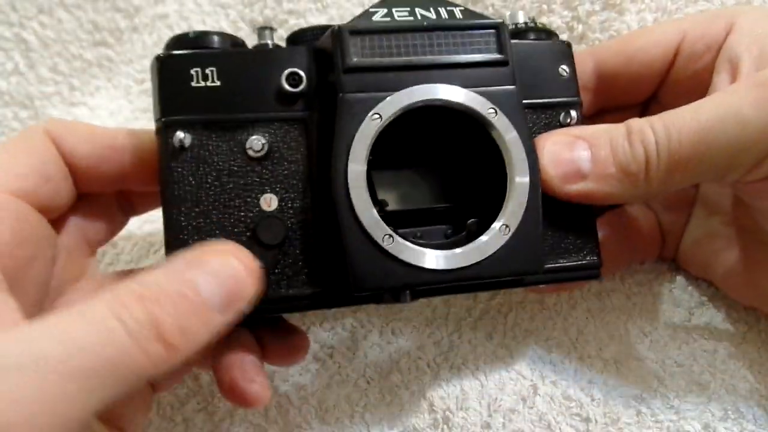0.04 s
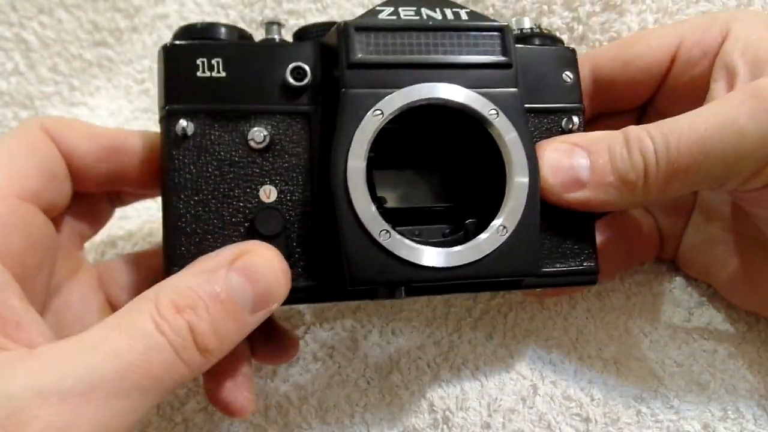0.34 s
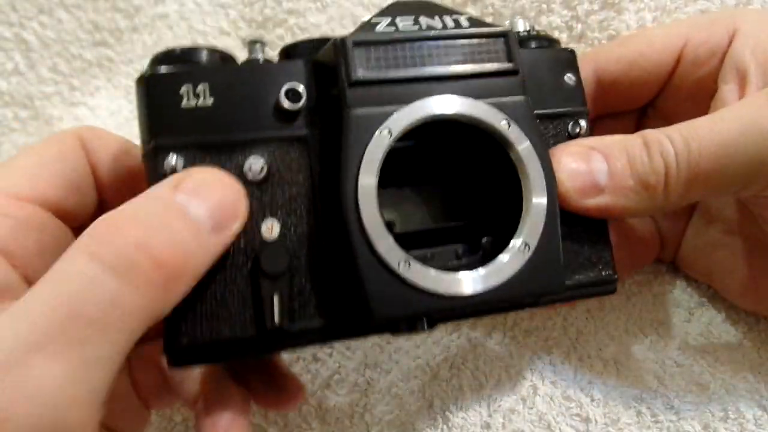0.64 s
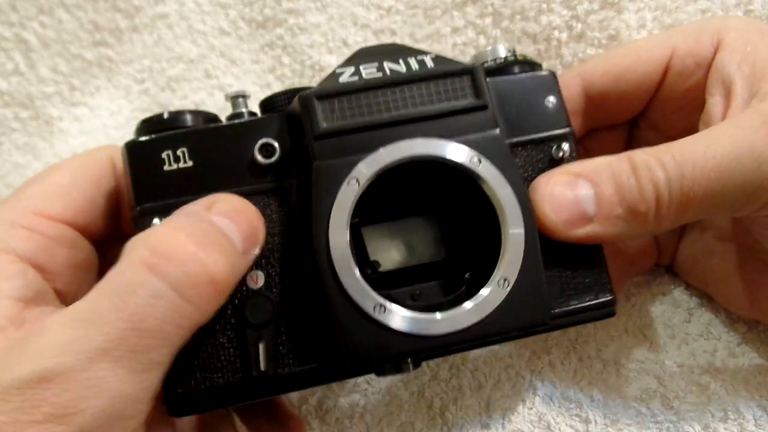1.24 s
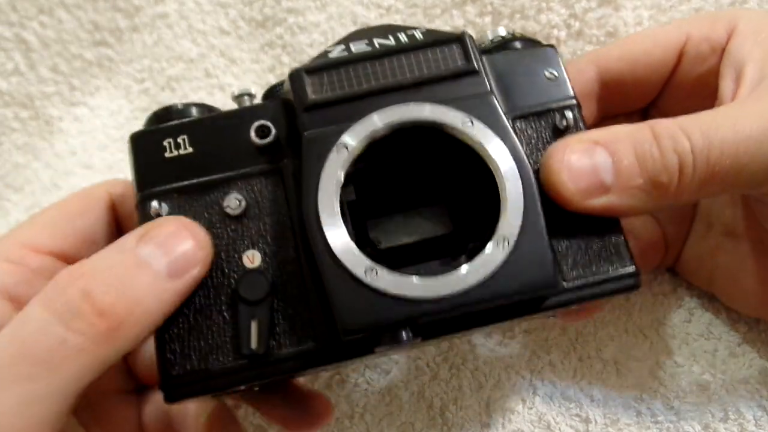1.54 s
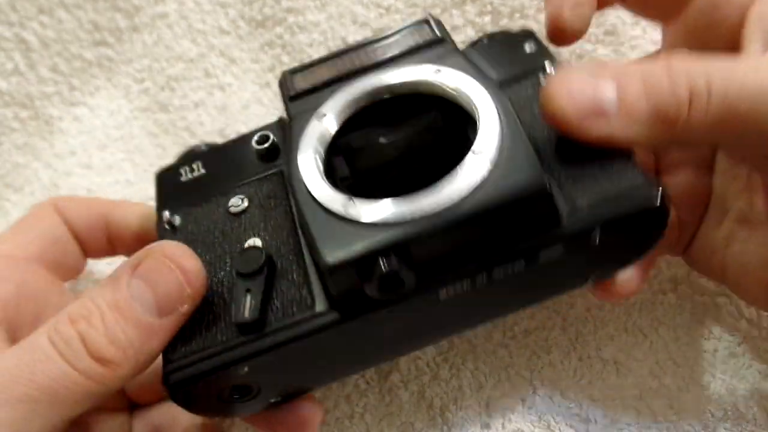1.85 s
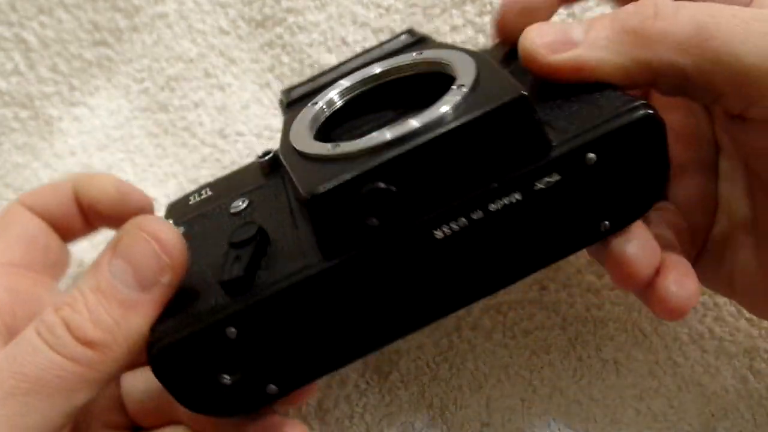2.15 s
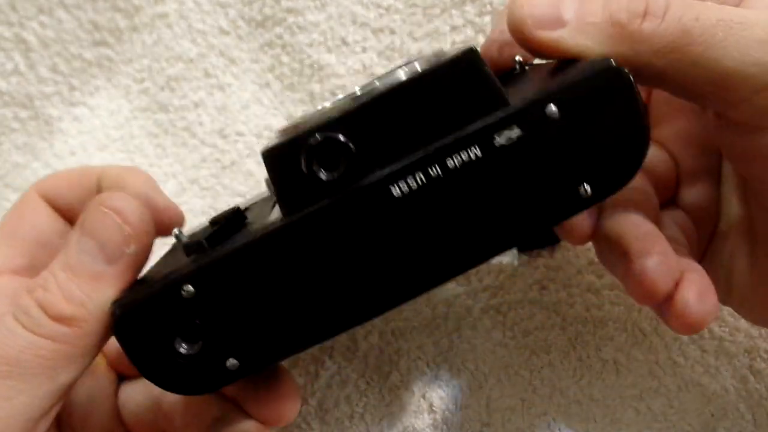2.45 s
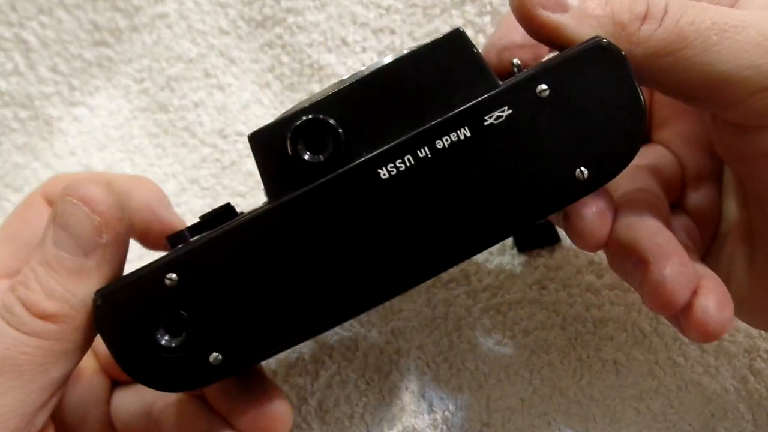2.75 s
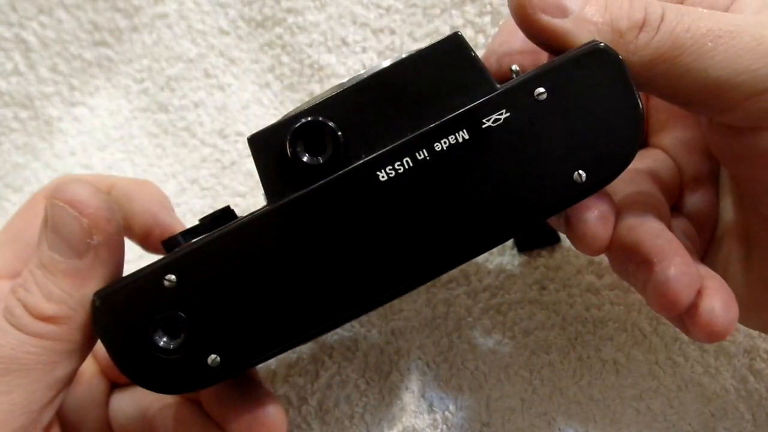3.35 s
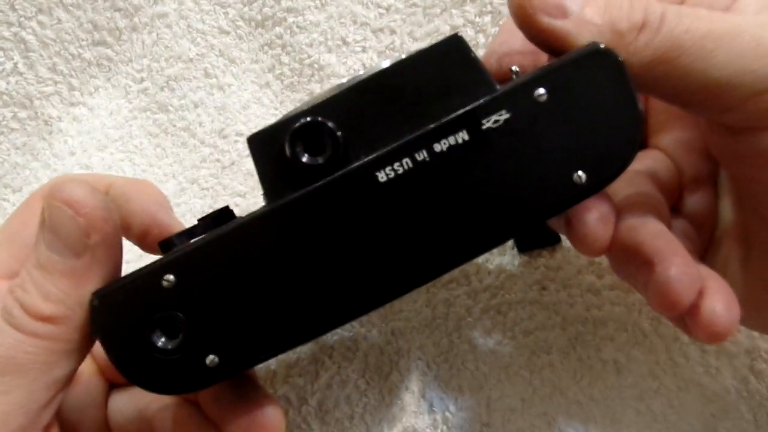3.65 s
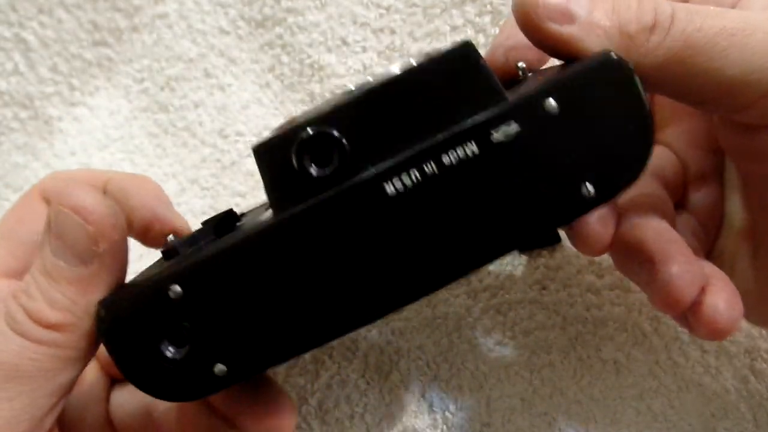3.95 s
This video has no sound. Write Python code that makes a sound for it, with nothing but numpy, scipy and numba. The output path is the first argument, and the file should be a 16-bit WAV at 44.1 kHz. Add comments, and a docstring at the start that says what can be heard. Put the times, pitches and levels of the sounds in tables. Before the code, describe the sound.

Close up in a quiet room, a wind-up camera timer gives a short whirr, two sharp clicks and a few faint taps. It then restarts with a snap, buzzing thinly and continuously, changing colour as the camera is turned over.

```python
"""A brief clockwork whirr slows to a halt: the self-timer of a metal camera, close by in a quiet room.
The lever clicks twice, then the spring is released and the escapement buzzes at about 225 beats a
second. Each beat is an impact that draws a bright tick from the steel parts and excites the modes
of the case. The hands turn the body over, which changes how it rings."""
import sys
import numpy as np
from scipy import signal
from scipy.fft import rfft, irfft
from scipy.io import wavfile
from scipy.ndimage import uniform_filter1d
from numba import njit

SR = 44100
rng = np.random.default_rng(int(sys.argv[2]) if len(sys.argv) > 2 else 0)


def output_pcm(signal):
    """Save a mono or channel-first signal as 16-bit PCM at the path in sys.argv[1].

    Samples are clipped to [-1, 1] before scaling.
    """
    pcm = np.clip(np.atleast_2d(signal).T, -1, 1) * 32767
    wavfile.write(sys.argv[1], SR, np.round(pcm).astype(np.int16))


N = 176400
TIME = np.arange(N) / SR


def undb(db):
    """Amplitude ratio of a level in decibels."""
    return 10 ** (np.asarray(db) / 20)


def curve(rows, column=1):
    """Linear interpolation of one column of a table over time."""
    rows = np.array(rows)
    return np.interp(TIME, rows[:, 0], rows[:, column])


def cut(x, order, hz, kind):
    """Maximally flat high-pass or low-pass filtering."""
    return signal.sosfilt(signal.butter(order, hz, kind, fs=SR, output="sos"), x)


def ring(x, response):
    """Convolution with an impulse response scaled to unit energy."""
    return signal.fftconvolve(x, response / np.linalg.norm(response))[:N]


def colour(points, size=2048):
    """Minimum-phase impulse response of a spectrum given as (Hz, dB) points."""
    hz, db = np.array(sorted(points)).T
    bin_hz = np.arange(size // 2 + 1) * SR / size
    gain = undb(np.interp(np.log(bin_hz + 1), np.log(hz), db))
    cepstrum = irfft(np.log(gain))
    cepstrum[1:size // 2] *= 2  # folding onto positive time makes the response causal
    cepstrum[size // 2 + 1:] = 0
    return irfft(np.exp(rfft(cepstrum)))


def modes(rows, size=4096):
    """Modal superposition: a sum of damped cosines, the wider resonances dying sooner."""
    t = TIME[:size]
    return sum(undb(db) * width * np.exp(-np.pi * width * t) * np.cos(2 * np.pi * hz * t)
               for hz, width, db in rows)


def resonate(x, hz, width_hz):
    """Forced response of a single damped resonance."""
    return ring(x, modes([(hz, width_hz, 0)]))


@njit
def band(x, hz, width_hz):
    """State-variable band-pass with unit gain at its moving centre."""
    y, band_state, low_state = np.empty(len(x)), 0., 0.
    for i in range(len(x)):
        step, damping = np.tan(np.pi * hz[i] / SR), width_hz / hz[i]
        passed = (band_state + step * (x[i] + 1e-18 - low_state)) / (1 + step * (step + damping))
        band_state = 2 * passed - band_state
        low_state += 2 * step * passed
        y[i] = damping * passed
    return y


def burst(start, db, decay_s):
    """Contact noise with a sudden onset and exponential decay."""
    age = TIME - start
    return undb(db) * (age >= 0) * np.exp(-np.maximum(age, 0) / decay_s) * rng.standard_normal(N)


# Spectrum of the room noise. Each row: frequency in Hz, relative density in dB.
ROOM_SPECTRUM = [(15, -61), (25, -10.5), (248, -5), (604, -9), (791, -5.5), (881, -11.5), (1550, -12.5),
                 (1730, -12.5), (5670, -19.5), (15800, -19)]
# Its loudness. Each row: time in seconds, level in dB.
ROOM_LEVEL = [(0, -53), (.44, -59), (.68, -57.5), (.8, -65), (.92, -70), (1.09, -74.5), (1.16, -64.5),
              (1.9, -65), (2.7, -60), (4, -64.5)]

def room_noise():
    """Spectrally shaped noise forms a soft floor that sinks during the pause."""
    return undb(curve(ROOM_LEVEL)) * ring(rng.standard_normal(N), colour(ROOM_SPECTRUM))


# Pace of the long run, shared by hum and ticks. Each row: time in seconds, beats per second.
LONG_BEAT_RATE = [(1.12, 233.6), (1.18, 216.5), (1.26, 218), (1.35, 234.3), (1.46, 223.2), (1.53, 236.6),
                  (1.9, 213.7), (1.94, 228), (2.16, 232.2), (2.54, 213.7), (2.76, 229.9), (3.34, 215.9),
                  (3.37, 227.1), (3.57, 220.4), (3.94, 205.2), (4.0, 213.2)]
# Loudness of the hum. Each row: time in seconds, rms level in dB.
BODY_HUM_LEVEL = [(1.1, -110), (1.3, -76), (1.6, -71), (2, -81), (2.7, -79.5), (4, -90)]

def body_hum():
    """Forced vibration: the whole body shakes faintly at the beat rate."""
    phase = 2 * np.pi * np.cumsum(curve(LONG_BEAT_RATE)) / SR
    return undb(curve(BODY_HUM_LEVEL)) * np.sqrt(2) * np.sin(phase)


# Palms rubbing on the body. Each row: time in seconds, level in dB.
PALM_LEVEL = [(1.1, -96), (1.2, -75.5), (2.0, -81.5), (2.7, -66), (4, -67.5)]

def palm_rub():
    """Sliding friction makes a soft, low band of noise."""
    return undb(curve(PALM_LEVEL)) * resonate(rng.standard_normal(N), hz=140, width_hz=120)


# Fingers on the body. Each row: start in seconds, level in dB, centre and width in Hz, decay in seconds.
FINGER_KNOCKS = [(1.109, -50, 500, 700, .012), (1.295, -54.5, 110, 110, 0.019),
                 (1.713, -54, 620, 800, 0.03)]

def finger_knocks():
    """Soft impacts excite low, heavily damped resonances."""
    return sum(resonate(burst(start, db, decay_s), hz, width_hz)
               for start, db, hz, width_hz, decay_s in FINGER_KNOCKS)


# Taps between the runs. Each row: start in seconds, level in dB.
FAINT_TAPS = [(0.367, -46.5), (0.603, -51), (.701, -57), (0.804, -54), (1.002, -66)]

def faint_taps():
    """Brief contacts excite one broad treble resonance."""
    contacts = sum(burst(start, db, decay_s=.0022) for start, db in FAINT_TAPS)
    return resonate(contacts, hz=5170, width_hz=2000)


# Two lever clicks and the release snap. Each row: start in seconds, level in dB, decay in seconds.
LEVER_IMPACTS = [(.2378, -29, .001), (.2392, -18, .0018), (.4665, -29, .001), (.4703, -23, .001),
                 (.4718, -16.5, .0012), (.4732, -17, .0018), (1.1163, -14, .0006), (1.141, -15, .0008)]
# Spectrum of a click. Each row: frequency in Hz, relative density in dB.
LEVER_SPECTRUM = [(150, -24), (1000, -21), (1520, -15.5), (2200, -22), (4090, -14.5), (5040, -0.5),
                  (5400, -13), (6800, -14), (9000, -7), (10400, -2.5), (13000, -7), (14700, 1.5),
                  (15700, -18)]

def lever_clicks():
    """Hard impacts are short and therefore broadband; each click is a cluster of them."""
    return ring(sum(burst(*impact) for impact in LEVER_IMPACTS), colour(LEVER_SPECTRUM))


def beat_times(rate, start_s, end_s):
    """Phase is the integral of rate: the escapement lets a tooth pass at each whole cycle."""
    t = TIME[int(start_s * SR):int(end_s * SR)]
    cycles = np.cumsum(np.interp(t, *np.array(rate).T)) / SR
    return np.interp(np.arange(int(cycles[-1]) + 1), cycles, t)


def impacts(times, blow_db, bounce_db, chatter_db, bounce_delay_s=.0008, chatter_decay_s=.0052):
    """Impact with rebound: each beat is a blow, four bounces and a fading chatter of loose parts."""
    blows, bounces = np.zeros(N), np.zeros(N)
    sample = lambda seconds: np.clip(seconds * SR, 0, N - 1).astype(int)
    strength = undb(blow_db)
    np.add.at(blows, sample(times), strength)
    delays = rng.exponential(bounce_delay_s, (len(times), 4))
    rebounds = undb(bounce_db) * strength[:, None] * rng.standard_normal(delays.shape)
    np.add.at(bounces, sample(times[:, None] + delays), rebounds)
    settling = signal.lfilter([1], [1, -np.exp(-1 / (SR * chatter_decay_s))], blows)
    return blows + bounces + undb(chatter_db) * settling * rng.standard_normal(N)


def escapement(times, unevenness=1, jitter_s=.00007, gear_db=-26, split_hz=12300):
    """Nearly periodic impacts drive the steel parts and the case; returns the force on each."""
    running = (TIME >= times[0]) & (TIME <= times[-1])
    shift, scatter = np.clip(rng.standard_normal((len(times), 2)), -1.5, 2.5).T
    times, scatter = times + jitter_s * shift, unevenness * scatter
    pallet = impacts(times, 2.5 * scatter, bounce_db=-10, chatter_db=-29)
    wheel = impacts(times, 1.64 * scatter, bounce_db=-6, chatter_db=-14.5)
    case = impacts(times, .3 * scatter, bounce_db=-11, chatter_db=-26)
    gear_rasp = undb(gear_db) * running * rng.standard_normal(N)
    unit = lambda force: force / force[running].std()
    # The pallet sounds above the split, the escape wheel below.
    steel = cut(unit(pallet), 5, split_hz, "high") + cut(unit(wheel), 5, split_hz, "low")
    return steel, unit(case + gear_rasp)


# Broad response of the case between its modes. Each row: frequency in Hz, relative density in dB.
SHELL_SPECTRUM = [(30, -56.5), (100, -32.5), (200, -15), (400, -13), (750, -10), (1050, -17), (1220, 3),
                  (2300, -2), (2700, -7), (4300, -2.5), (5300, -15), (5800, -7.5), (9000, -15.5)]

def case_ring(force, resonances, shell_db, cutoff_hz=1235):
    """Radiation from a shell: modes sound above a cutoff, and a broad response fills in between."""
    modal = cut(ring(force, modes(resonances)), 6, cutoff_hz, "high")
    broad = undb(shell_db) * ring(force, colour(SHELL_SPECTRUM))
    return (modal + broad) / np.hypot(1, undb(shell_db))


# Pace of the short run. Each row: time in seconds, beats per second.
SHORT_BEAT_RATE = [(0, 137), (.022, 149), (.04, 151), (.08, 121), (.11, 178), (.13, 135)]
# Its final teeth pass one by one. Each entry: time in seconds.
FINAL_TEETH_S = [.1338, .1434, .152, .1606, .1713, .1825, .1932]
# Spectrum of its steel ticks. Each row: frequency in Hz, relative density in dB.
SHORT_TICKS = [(2940, -57.5), (5000, -8.5), (5450, -22), (6150, -16.5), (8450, -16), (10300, -5),
               (11700, -13), (12100, -8), (14300, -2), (15400, -2.5), (15800, -5)]
# Modes of the case. Each row: frequency in Hz, bandwidth in Hz, relative peak in dB.
SHORT_MODES = [(1587, 48, -3.5), (2223, 62, -4), (2380, 23, -9), (2556, 170, -8.5), (2930, 85, -10),
               (3090, 32, -17), (3270, 43, -7), (3630, 120, -7.5), (3960, 76, -8), (4223, 37, 2),
               (4970, 200, -5.5), (5700, 110, -8), (6000, 180, -4.5), (6700, 270, -10)]

def short_run():
    """An impulse train slows, so that its buzz breaks up into separate ticks and stops."""
    times = np.append(beat_times(SHORT_BEAT_RATE, start_s=.0016, end_s=.128), FINAL_TEETH_S)
    steel, case = escapement(times, unevenness=.3)
    ticks = undb(-23) * ring(steel, colour(SHORT_TICKS))
    return ticks + undb(-40) * case_ring(case, SHORT_MODES, shell_db=-8.5)


# Loudness of the long run. Each row: time in seconds, steel ticks in dB, case ring in dB.
RUN_LEVELS = [(1.12, -14.5, -36), (1.14, -17, -42), (1.16, -15, -35.5), (1.51, -17, -38),
              (1.59, -14, -37.5), (1.63, -26, -40), (1.65, -21.5, -41), (1.79, -24, -49), (2.06, -26, -46),
              (2.19, -23.5, -44), (2.36, -26.5, -42), (2.41, -23.5, -39), (2.5, -25.5, -43.5),
              (2.79, -22, -38.5), (2.84, -22.5, -39), (3.98, -23, -38.5)]
# The body leaves face-on, is tilted, tilts on, rests mostly base up. Each entry: time in seconds.
TURN_TIMES_S = [1.58, 1.72, 2.149, 2.6]
# Tick spectra in the three poses. Each row: frequency in Hz, relative density in dB.
FRONT_TICKS = [(2940, -38.5), (5000, -27), (5780, -43), (6180, -21), (7240, -25.5), (8700, -15.5),
               (9210, -18.5), (13000, -7.5), (14400, 2), (15800, -1.5)]
TILTED_TICKS = [(2940, -35), (5000, -19), (5590, -26.5), (6670, -15.5), (7240, -19), (7820, -15.5),
                (8490, -14.5), (12200, -10), (14400, -0.5), (15100, 4.5), (15800, -5)]
BASE_TICKS = [(2940, -50.5), (5000, -25), (5780, -30), (6180, -19.5), (7900, -10), (8410, -15.5),
              (9810, -4), (10700, -12.5), (11300, -3), (11700, -9), (12900, 1), (13500, -3.5), (14650, 5),
              (15300, 3.5), (15700, -4.5)]
# Case modes in the three poses. Each row: frequency in Hz, bandwidth in Hz, relative peak in dB.
FRONT_MODES = [(1560, 34, 1.5), (2087, 46, -1), (2350, 47, -8), (2706, 51, -7.5), (2996, 51, -12),
               (3343, 38, -8), (3670, 140, -12), (4210, 35, -4.5), (4920, 270, -3), (5530, 80, -5),
               (5500, 30, -21), (6150, 79, -2), (6400, 44, -6), (6760, 74, -7.5)]
TILTED_MODES = [(1587.6, 89, 2.5), (1890, 112, 2), (2395, 73, -24), (2880, 38, -3), (3260, 24, -3.5),
                (3425, 160, -8.5), (3875, 46, 0.5), (4310, 63, -15), (4890, 110, -7), (5440, 45, -19),
                (6960, 170, -6)]
BASE_MODES = [(1570, 45, 2.5), (1930, 150, -2), (2078.4, 37.9, -8), (2310, 53, -12.5), (2630, 390, -13),
              (3280, 160, -9), (3924, 28, -6), (4155, 52, -2.5), (4320, 33, -12), (4810, 33, -0.5),
              (5280, 55, -4.5), (5650, 29, -1), (6010, 48, -3), (6340, 70, -5.5)]
# Broad response of the shell. Each entry: level in dB against the modes, for one pose.
SHELL_BALANCE_DB = [-6, -8.5, -7.5]
# A cancellation that slides down with the tilt. Each row: time in seconds, centre in Hz, depth 0 to 1.
TILT_NOTCH = [(1.6, 12020, 0), (1.75, 10350, 0.8), (1.88, 9670, 0.9), (2.0, 8960, 0), (2.2, 8500, 0)]

def long_run():
    """Directional radiation: the buzz changes colour as the body turns through three poses."""
    steel, case = escapement(beat_times(LONG_BEAT_RATE, start_s=1.11, end_s=4.0))
    pose = np.interp(TIME, TURN_TIMES_S, [.0069, .95, 1.07, 1.7])  # 0 face-on, 1 tilted, 2 base up
    tick_gain, case_gain = undb(curve(RUN_LEVELS)), undb(curve(RUN_LEVELS, column=2))
    poses = [(FRONT_TICKS, FRONT_MODES), (TILTED_TICKS, TILTED_MODES), (BASE_TICKS, BASE_MODES)]
    buzz = 0
    for k, (spectrum, resonances) in enumerate(poses):
        share = np.maximum(1 - abs(pose - k), 0)
        ticks = tick_gain * ring(steel, colour(spectrum))
        ringing = case_gain * case_ring(case, resonances, SHELL_BALANCE_DB[k])
        buzz += share * (ticks + ringing)
    return buzz - curve(TILT_NOTCH, column=2) * band(buzz, curve(TILT_NOTCH), width_hz=2200.)


def moving_echoes(x, decay_s, patterns, size=16384):
    """Diffuse reflection: random echo patterns crossfade at constant power as the camera moves."""
    place = np.linspace(0, patterns - 1, N)
    decay = np.exp(-TIME[:size] / decay_s)
    shares = (np.maximum(1 - abs(place - k), 0) for k in range(patterns))
    return sum(np.sqrt(share) * ring(x, rng.standard_normal(size) * decay) for share in shares)


def reflections(x, room_t60_s=.16, room_db=-8.5, near_db=-4, near_top_hz=10000):
    """Brief room reverberation; interference with near echoes off a close surface combs all but the top treble."""
    x = x + undb(room_db) * moving_echoes(x, room_t60_s / np.log(1000), patterns=9)
    low = signal.sosfiltfilt(signal.butter(4, near_top_hz, fs=SR, output="sos"), x)
    near = undb(near_db) * moving_echoes(low, decay_s=.006, patterns=16)
    return x - low + (low + near) / np.hypot(1, undb(near_db))


def drift(steps_per_s):
    """A moving average smooths random steps into a slow wander with a spread near 1."""
    hold = int(SR / steps_per_s)
    return uniform_filter1d(np.repeat(rng.standard_normal(N // hold + 1), hold), hold)[:N]


# Narrow dips in each run, the long run's widest near 5.8 kHz. Each row: centre in Hz, width in Hz.
SHORT_DIPS = [(1750, 115), (4530, 300)]
LONG_DIPS = [(1720, 24), (4030, 45), (5760, 294), (6530, 58)]

def spectral_dips(x, dips, wander_share=.009):
    """Band rejection: narrow, slightly wandering dips hollow out the sound."""
    for hz, width_hz in dips:
        centre_hz = hz * (1 + wander_share * drift(steps_per_s=5))
        x = x - band(x, centre_hz, float(width_hz))
    return x


def scene():
    """Superposition of the handled camera, its two runs and the room noise, in one channel."""
    whirr_and_hands = short_run() + lever_clicks() + faint_taps() + finger_knocks() + palm_rub()
    whirr_and_hands = spectral_dips(reflections(whirr_and_hands), SHORT_DIPS)
    buzz = spectral_dips(reflections(long_run()), LONG_DIPS)
    return (whirr_and_hands + buzz + body_hum() + room_noise())[None]


def record(dry, low_cut_hz=63, top_hz=15720):
    """Band limiting thins the deep bass and cuts the top steeply."""
    thinned = cut(dry, 2, low_cut_hz, "high")
    return signal.sosfilt(signal.ellip(16, .1, 80, top_hz, fs=SR, output="sos"), thinned)


dry = scene()
out = record(dry)
output_pcm(out)
```